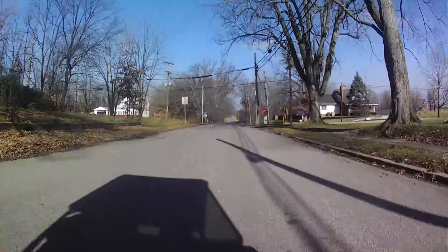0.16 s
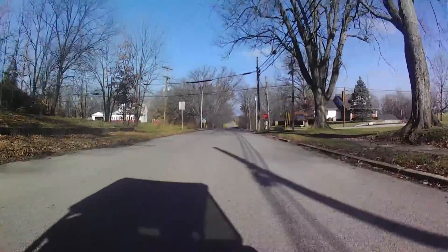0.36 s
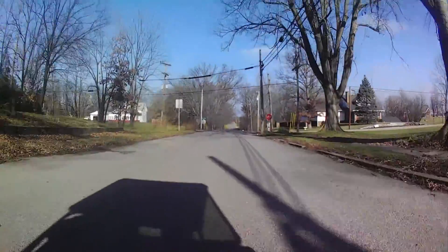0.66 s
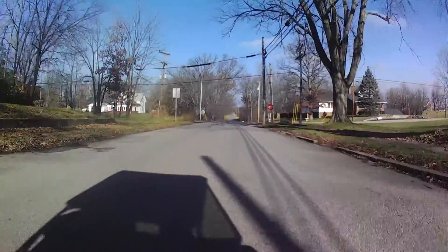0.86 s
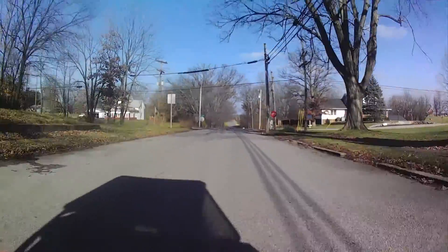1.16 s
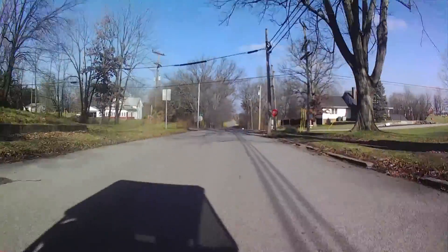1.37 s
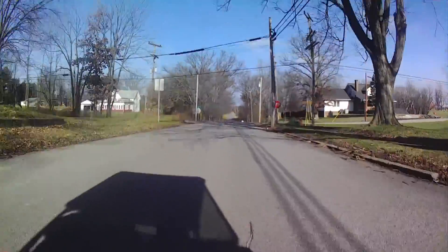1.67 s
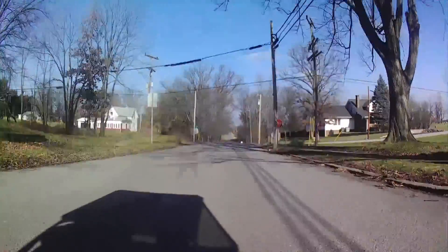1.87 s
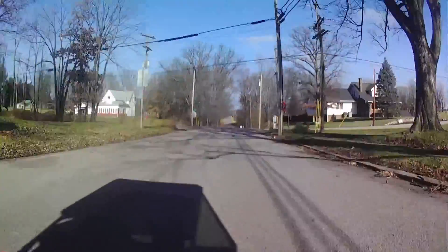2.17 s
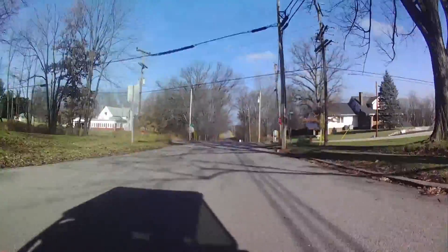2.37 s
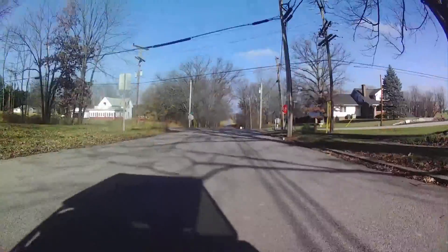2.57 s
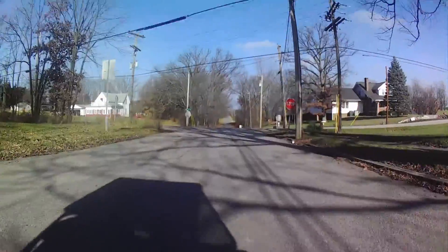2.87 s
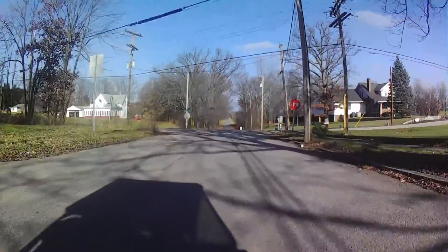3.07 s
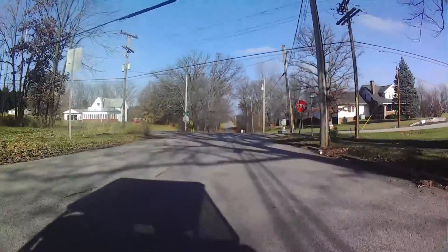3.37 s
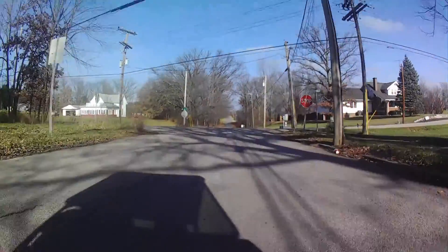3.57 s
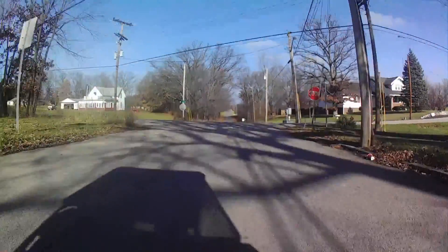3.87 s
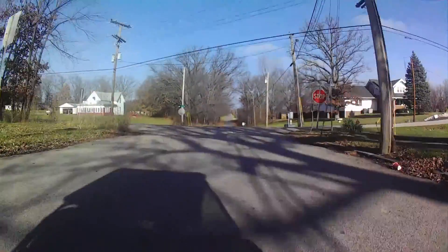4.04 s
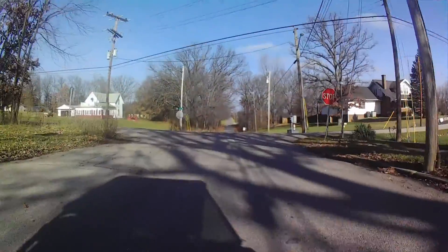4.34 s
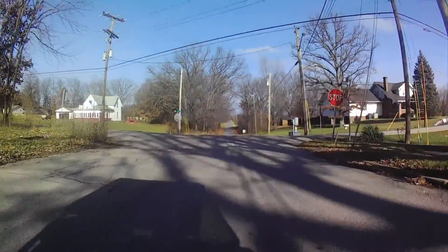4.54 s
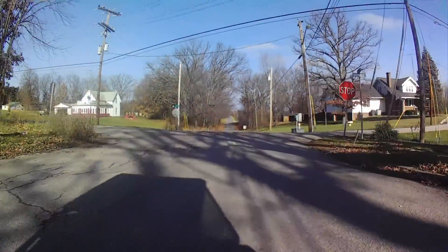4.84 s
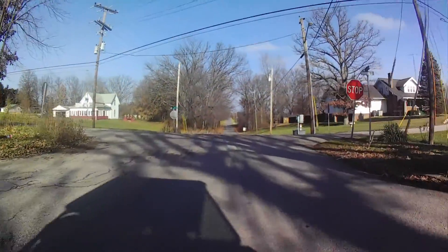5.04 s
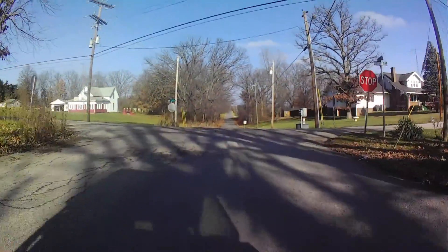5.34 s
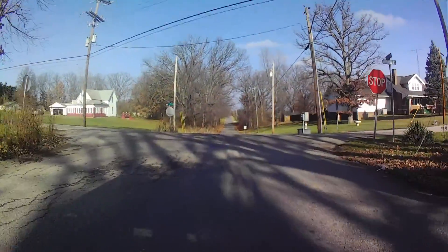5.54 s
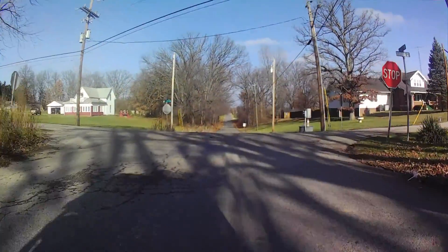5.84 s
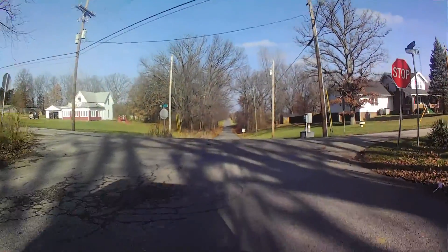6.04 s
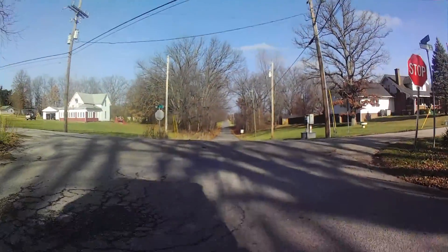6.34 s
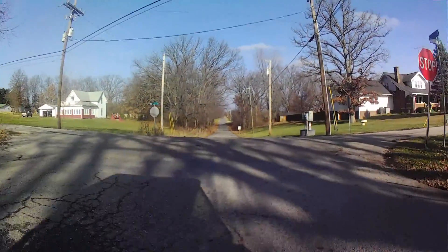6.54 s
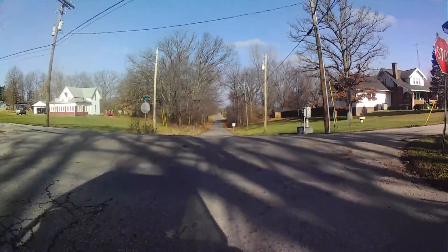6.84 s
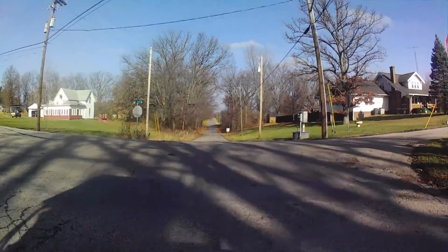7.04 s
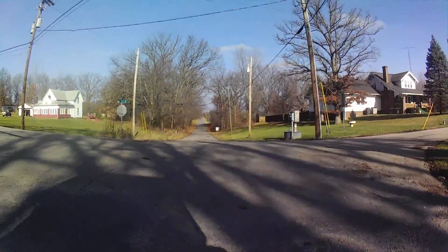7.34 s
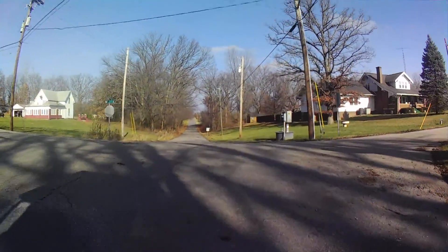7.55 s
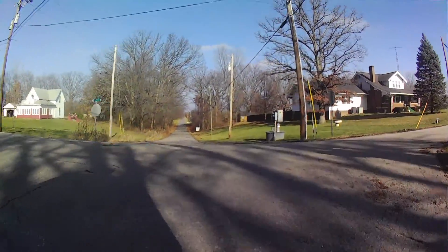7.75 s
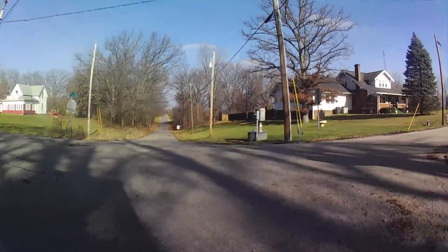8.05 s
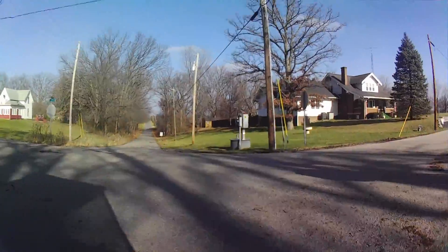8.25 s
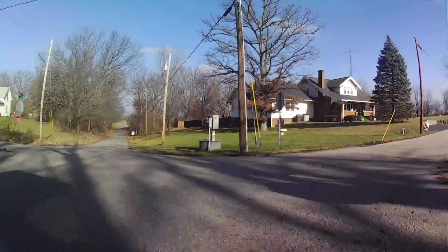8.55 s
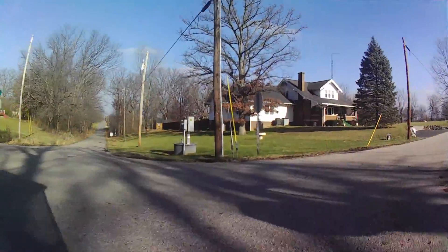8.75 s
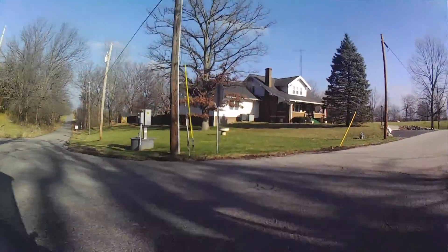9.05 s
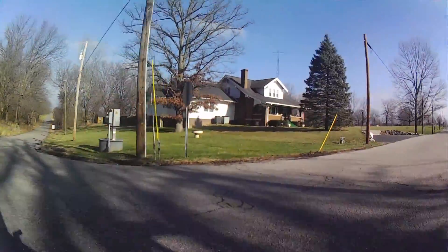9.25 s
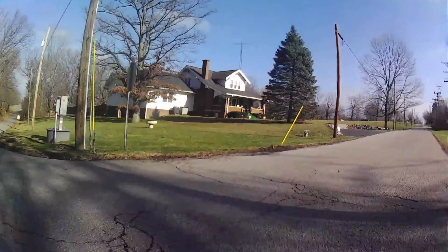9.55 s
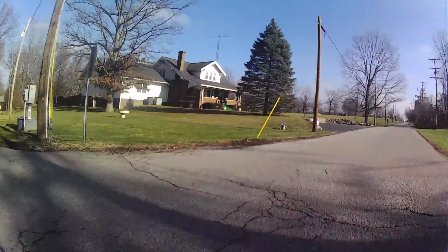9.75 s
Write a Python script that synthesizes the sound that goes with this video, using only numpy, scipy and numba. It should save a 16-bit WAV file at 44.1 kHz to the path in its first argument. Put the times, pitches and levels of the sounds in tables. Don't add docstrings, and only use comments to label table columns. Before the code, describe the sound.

A cheap microphone rides on a small petrol cart outdoors, with no room echo and squashed, gritty sound. From 0 to 4 s the two-cylinder engine putters unevenly at moderate speed, briefly surging near 1.6 s, with metallic valve clacks, low frame hum, broad tyre roar and dense panel rattle. Chassis thuds cluster through the first 2 s, with the hardest knocks near 3.2 and 3.5 s; a faint tread whine falls in pitch until 3 s. Small bracket raps and latch clicks scatter throughout. From 4 to 6.5 s the cart coasts, tyres quieten, brake drag adds hiss, and the engine sinks to a slow lumpy idle. Between 6.7 and 7.5 s it catches in irregular low pops and short bursts. Revs climb to about 8.2 s, then a fuller, steady exhaust growl with rougher road rumble and rattles continues to the end near 9.9 s.

```python
import sys
import numpy as np
from scipy import signal
from scipy.fft import rfft, irfft
from scipy.io import wavfile
from scipy.ndimage import uniform_filter1d
from numba import njit

SR = 44100
rng = np.random.default_rng(int(sys.argv[2]) if len(sys.argv) > 2 else 0)


def how_loud(loudness_db):
    steps = np.asarray(loudness_db, float) / 20
    return 10 ** steps


def dump_mix(stems):
    frames = np.atleast_2d(stems).T
    limited = np.clip(frames, -1, 1)
    pcm = np.round(limited * 32767).astype(np.int16)
    wavfile.write(sys.argv[1], SR, pcm)


N = 437031
PULLING_DB = -33


def level(x, db):
    return x * how_loud(db) / np.sqrt(np.mean(x ** 2))


def columns(table):
    s, *rest = np.transpose(table)
    t = np.arange(N) / SR
    return [np.interp(t, s, column) for column in rest]


def swells(table, rise_s, fall_s):
    t = np.arange(N) / SR
    return sum(np.interp(t, [s - rise_s, s, s + fall_s], [0, db, 0]) for s, db in table)


@njit
def svf(x, hz, width):
    y = np.empty(len(x))
    band, low = 0., 0.
    g, k = np.tan(np.pi * hz / SR), width / hz
    for i in range(len(x)):
        v = (band + g * (x[i] - low)) / (1 + g * (g + k))
        band, low = 2 * v - band, low + 2 * g * v
        y[i] = k * v
    return y


def steep(x, hz, width):
    hz, width = float(hz), float(width)
    return svf(svf(x, hz, width), hz, width)


def coloured(points):
    hz, db = np.transpose(points)
    log_f = np.log(np.fft.rfftfreq(N, 1 / SR) + 1)
    gain = how_loud(np.interp(log_f, np.log(hz), db, left=-90, right=-90))
    return level(irfft(rfft(rng.standard_normal(N)) * gain, N), 0)


def walk(rate_hz):
    hold = int(SR / rate_hz)
    steps = np.repeat(rng.standard_normal(N // hold + 1), hold)
    return uniform_filter1d(steps, hold // 2)[:N]


def per_cycle(turn, place, scatter_db):
    gains = how_loud(scatter_db * rng.standard_normal(size=400))
    return gains[(turn - place + 1.5).astype(int)]


PUFFS = [
    (.18, -.45, .7),
    (.392, .4, .15),
    (.548, -.45, -.6),
    (.75, -.65, .55),
]
# cycle_multiple, level_db
LOAD_NOTES = [(8, -17), (14, -18), (16, -17), (17, -19), (21, -17)]
# peak_s, extra_effort_db
CATCHES = [
    (6.74, 24),
    (7.0, 20),
    (7.24, 13),
    (7.46, 8),
]


def exhaust(turn, effort_db):
    effort_db = effort_db + swells(CATCHES, rise_s=0.018, fall_s=0.085)
    boom, bark = np.zeros(N), np.zeros(N)
    for place, boom_push, bark_push in PUFFS:
        count = np.floor(turn - place)
        pulse = np.diff(count, prepend=count[0]) * per_cycle(turn, place, 0.43)
        boom += boom_push * pulse
        bark += bark_push * pulse
    chambers = level(steep(boom, hz=118, width=68) + steep(bark, hz=329, width=85), 0)
    notes = sum(np.sqrt(2) * how_loud(db) * np.cos(2 * np.pi * k * turn) for k, db in LOAD_NOTES)
    coast_db = 0.8 * np.minimum(effort_db - PULLING_DB, 0)
    return how_loud(effort_db) * (chambers + notes * how_loud(coast_db))


# start_s, level_db, pitch_hz
POPS = [
    (6.726, -31, 191),
    (6.929, -33, 193),
    (6.989, -16.5, 191),
    (7.029, -21.5, 190),
    (7.224, -17.5, 189),
    (7.323, -21, 190),
    (7.399, -20, 190),
    (7.449, -24, 190),
    (7.519, -22, 190),
]


def lone_firings():
    return knocks(POPS, burst_s=0.0092, cycles=0.48, gain_db=2.1, crack=0.3)


# place_cycle [0-1], level_db
CLACKS = [
    (.015, 0),
    (.54, -11),
    (.68, -8.5),
]
# freq_hz, width_hz, level_db
CASING = [(1742.5, 147, 1), (1940, 104, -1.5), (1803, 140, -17.5), (1135, 190, -4.5)]


def casing(turn, lash_db):
    def ring(x):
        return level(sum(how_loud(db) * steep(x, hz, width) for hz, width, db in CASING), 0)

    clacks = np.zeros(N)
    for place, db in CLACKS:
        late = (turn - place + 0.5) % 1 - 0.5
        hz = 1880 * per_cycle(turn, place, 0.12) + 1700 * late
        chatter = np.sin(2 * np.pi * np.cumsum(hz) / SR) + 0.6 * rng.standard_normal(N)
        burst = np.exp(-(late / 0.05) ** 2)
        clacks += how_loud(db) * per_cycle(turn, place, 1.2) * burst * chatter
    clatter = steep(clacks, 1900, 900) + 0.5 * ring(clacks) * clacks.std()

    base_db, lash_share = -34.5, 0.1
    buzz_db = base_db + lash_share * (lash_db - base_db)
    stirred = 0.39 + 1.2 * np.exp(-((turn - CLACKS[0][0]) % 1) / 0.054)
    flicker_db = 1.2 * walk(25)
    buzz = how_loud(buzz_db - 0.5 + flicker_db) * ring(stirred * rng.standard_normal(N))
    return how_loud(lash_db) * level(clatter, 0) + buzz


# cycle_multiple, level_db
HUM = [(3, -16), (5, 4.5), (6, -26), (9, -5), (10, -17), (14, -10), (18, -10.5)]


def frame(turn, cycle_hz, effort_db):
    cruise_hz, cruise_effort_db, idle_hz = 16, -35, 14
    hum_db = -41 + 0.96 * (cycle_hz - cruise_hz) - 0.14 * (effort_db - cruise_effort_db)
    hum_db = hum_db + 3.5 * np.minimum(cycle_hz - idle_hz, 0)
    lines = np.zeros(N)
    for k, db in HUM:
        phase = 2 * np.pi * k * turn + 0.17 * walk(5.4) + k * k
        lines += how_loud(db + 2.1 * walk(5)) * np.sin(phase)
    return np.sqrt(2) * how_loud(hum_db) * lines


# freq_hz, density_db [dB per Hz]
RUMBLE = [(28, -31), (54, -6.5), (85, -3.5), (200, -1.5), (330, -2.5), (400, -7.5), (470, -16.5)]
ROAR = [(340, -9), (420, 0), (540, 0.5), (700, -2.5), (1100, -4.5), (1450, -6), (2000, -7.5), (2450, -32.5),
        (2900, -29)]
# time_s, pitch_hz, level_db
TREAD = [
    (.55, 128.2, -44),
    (.7, 129.6, -34),
    (1.4, 121.7, -50),
    (1.8, 121.9, -36),
    (1.92, 120.9, -30.5),
    (2.2, 118.2, -53),
    (2.5, 111.4, -35),
    (2.8, 105.7, -31.5),
    (3.1, 104.4, -49.5),
]


def tyres(turn, roar_db, rough_db, effort_db):
    patch_db = 1
    rumble_db = 0.5 + roar_db + 0.97 * rough_db - 0.9 * np.maximum(effort_db - PULLING_DB, 0)
    throb = 0.69 + sum(1.03 * np.exp(-((turn - place) % 1) / 0.2) for place, _, _ in PUFFS[::2])
    rumble = coloured(RUMBLE) * throb * how_loud(rumble_db - 1.5 + patch_db * walk(11))
    roar = coloured(ROAR) * how_loud(roar_db + 5.0 + patch_db * walk(16))

    fade_in = (TREAD[0][0] - 0.1, TREAD[0][1], -70)
    fade_out = (TREAD[-1][0] + 0.1, TREAD[-1][1], -70)
    hz, db = columns([fade_in, *TREAD, fade_out])
    tread = np.sqrt(2) * how_loud(db) * np.sin(2 * np.pi * np.cumsum(hz) / SR)
    return rumble + roar + tread


# peak_s, swell_db
JOLTS = [(.63, 2.5), (.72, 3), (1.02, 6), (1.16, 3), (1.35, 4), (1.43, 2), (1.52, 5.5), (1.63, 9),
         (2.07, 8), (2.15, 6), (2.21, 6), (2.48, 5.5), (2.56, 7), (2.76, 1), (2.84, 6.5), (3.23, 6.5),
         (4.14, 2), (4.22, 3), (5.45, 4), (6.02, 5), (6.32, 3), (6.65, 10), (6.82, 7), (7.09, 4.5),
         (7.46, 7), (7.52, 6), (7.84, 7.5), (7.92, 4), (8.06, 6), (8.69, 6)]
# dip_s, dip_db
LULLS = [(.69, -7.5), (1.24, -7), (1.41, -8), (1.49, -2), (2.45, -5), (2.54, -5), (2.73, -7.5),
         (2.81, -8.5), (3.17, -4), (3.37, -9), (4.08, -9), (4.19, -6), (4.29, -9), (4.46, -13), (4.53, -10),
         (4.62, -11), (5.11, -9), (5.23, -12), (5.4, -9), (5.93, -14), (6.15, -13.5), (6.35, -8),
         (6.57, -9), (6.79, -17), (6.93, -17), (7.06, -10), (7.2, -8), (7.42, -5), (7.78, -1), (8.64, -5.5)]
# start_s, end_s, level_db
BRAKING = [
    (4.705, 4.86, -2.5),
    (4.95, 5.08, 1),
    (5.44, 5.913, 3),
    (6.21, 6.547, 0),
]
# freq_hz, density_db [dB per Hz]
BELT = [(5300, 0), (6100, 10.5), (7200, 7.5), (8200, 4), (9600, 0), (12200, 1.5), (13000, 12.5)]


def bodywork(roar_db, rough_db):
    jolt_db = swells(JOLTS, rise_s=0.028, fall_s=0.041)
    lull_db = swells(LULLS, rise_s=0.031, fall_s=0.031)
    brake_db, edge_s = np.zeros(N), 0.03
    for start_s, end_s, db in BRAKING:
        brake_db += columns([(start_s - edge_s, 0), (start_s, db), (end_s, db), (end_s + edge_s, 0)])[0]
    roll_db = roar_db + 32
    shake_db = -46 + roll_db + 0.9 * rough_db + jolt_db + 0.56 * lull_db + 0.54 * brake_db
    hiss_db = -48.5 - 0.0036 * roll_db + 0.72 * jolt_db + lull_db + brake_db

    grain = how_loud(0.88 * walk(24))
    panels = coloured([(1100, -16), (1500, 5.5), (2150, 6.0), (2500, 0.5), (2800, -8.5), (3300, -4),
                       (3800, -2.5), (4500, -6.5), (5500, -27)])
    panels = panels * how_loud(shake_db + 4.0 + 3.6 * walk(250) + 1.2 * walk(15))
    belt = coloured(BELT) * how_loud(hiss_db + 0.3 + 3.53 * walk(300) + 0.61 * walk(20))

    ticks_per_s, scatter_db = 110, 13
    ticks = (rng.random(N) < ticks_per_s / SR) * how_loud(scatter_db * rng.random(N))
    jingle = level(steep(ticks, hz=3260, width=417), -5) * how_loud(shake_db)
    return grain * (panels + belt) + jingle


def knocks(table, burst_s, cycles, gain_db, crack):
    out, t = np.zeros(N), np.arange(4096) / SR
    for s, db, hz in table:
        burst = rng.standard_normal(len(t)) * np.exp(-t / burst_s)
        ring = steep(burst, hz, hz / cycles)
        snap = svf(burst * np.exp(-t / 0.0093), 0.88 * hz, 2. * hz)
        knock = (ring / np.abs(ring).max() + crack * snap) * how_loud(db + gain_db)
        i = int(s * SR)
        out[i:i + len(t)] += knock[:N - i]
    return out


# start_s, level_db, pitch_hz
BUMPS = [(0.27, -18, 190), (1.07, -14, 179.6), (1.53, -14.5, 197), (1.62, -12, 193), (4.2, -20, 200),
         (0.426, -14, 477), (0.722, -13, 388), (1.005, -12, 468), (1.192, -11, 312), (1.573, -13, 322),
         (2.924, -15, 321), (3.227, -6, 587), (3.469, -9.5, 596), (3.771, -24, 310), (5.084, -22, 334),
         (5.289, -20, 324), (6.991, -30, 250)]


def bumps():
    return knocks(BUMPS, burst_s=0.0076, cycles=4.4, gain_db=-7.5, crack=0.28)


# start_s, level_db, pitch_hz
RATTLES = [(0.332, -24, 3090), (0.6315, -22, 2940), (1.1418, -22.5, 3170), (1.5293, -23, 3120),
           (1.6137, -29, 3090), (1.8346, -22, 3300), (1.9619, -20, 3500), (2.0445, -20, 3020),
           (2.2055, -20, 3250), (2.2897, -22, 3320), (2.396, -20, 3290), (2.4626, -35, 3250),
           (2.7631, -26, 3296), (3.3992, -24.5, 3270), (3.5772, -25, 3300), (3.7688, -28, 3220),
           (4.2225, -24.5, 3160), (4.8304, -26, 3280), (5.832, -30.5, 3240), (6.0028, -32.5, 3290),
           (6.092, -29.5, 3240), (6.185, -36, 3260), (6.3789, -31, 3310), (6.6394, -30.5, 3290),
           (6.8274, -38, 3330), (7.449, -23, 3150), (8.2033, -26, 3300), (8.3624, -31, 3400),
           (9.5233, -25, 3180), (9.7058, -26, 3260)]


def bracket():
    return knocks(RATTLES, burst_s=0.0069, cycles=3.5, gain_db=-1.9, crack=0.55)


# start_s, level_db, pitch_hz
LATCH = [(0.4908, -27, 3270), (1.1039, -24, 2520), (1.1877, -29, 2400), (1.4382, -27, 3390),
         (1.5133, -26, 3150), (1.5808, -20, 2520), (1.6626, -21, 2500), (1.9055, -23, 2970),
         (2.145, -23, 3340), (2.2293, -21, 2300), (2.3792, -24, 2570), (2.4816, -28, 3260),
         (2.586, -26, 3330), (3.2171, -28, 2370), (3.478, -28, 2760), (3.9556, -28, 3190),
         (5.4475, -36, 3280), (7.4764, -31, 2600), (7.5154, -23, 2570), (7.891, -39, 2410),
         (8.034, -23, 2450), (8.074, -32, 2510), (8.4801, -27, 3270), (9.1197, -21, 2440),
         (9.2414, -22.5, 2380), (9.605, -40, 3230)]


def seat_latch():
    return knocks(LATCH, burst_s=0.018, cycles=3.1, gain_db=-2.6, crack=0.61)


# time_s, cycle_hz [four-stroke cycles per s]
SPEED = [(0.0, 17.85), (0.9, 17.22), (1.22, 18.41), (1.39, 17.49), (1.64, 20.33), (2.47, 17.55),
         (2.83, 16.89), (5.1, 15.01), (6.0, 12.42), (6.21, 11.02), (6.6, 10.29), (6.94, 11.96),
         (7.31, 13.28), (7.57, 15.26), (8.18, 17.57), (8.94, 17.01), (9.35, 16.31), (9.91, 17.12)]
# time_s, effort_db, lash_db
EFFORT = [(0, -33, -52), (.5, -34.5, -38), (1, -40, -51), (1.5, -29.5, -43), (1.75, -38, -46),
          (2.1, -46, -36.5), (3.2, -32, -38), (4, -38, -33), (4.6, -39, -33), (5.1, -37, -29.5),
          (5.6, -41, -35), (5.95, -46.5, -37.5), (6.2, -54, -34), (7.1, -47, -35.5), (7.5, -35, -32),
          (7.8, -27, -41), (8.3, -26, -35.5), (9.91, -27, -37.5)]
# time_s, roar_db, rough_db
ROAD = [(0, -27.5, -1.5), (.5, -29, -0.5), (1.1, -29, 1.5), (1.35, -29.5, -0.5), (1.62, -28.5, 3.5),
        (1.75, -29.5, -0.5), (2.2, -30, 3), (3.2, -30.5, -1), (4.2, -33.5, 1), (5.2, -35.5, 1.5),
        (5.7, -37, 1), (6.8, -37, -2), (7.2, -34, 0), (7.5, -34.5, 3), (8, -33, 4.5), (8.6, -33, 3.5),
        (9.2, -32, 3.5), (9.91, -33, 5.5)]


def scene():
    cycle_hz, = columns(SPEED)
    start_turn = 0.561
    turn = start_turn + np.cumsum(cycle_hz) / SR
    effort_db, lash_db = columns(EFFORT)
    roar_db, rough_db = columns(ROAD)
    engine = exhaust(turn, effort_db) + lone_firings()
    engine = engine + casing(turn, lash_db) + frame(turn, cycle_hz, effort_db)
    cart = tyres(turn, roar_db, rough_db, effort_db) + bodywork(roar_db, rough_db)
    loose = bumps() + bracket() + seat_latch()
    return (engine + cart + loose)[None]


# low_hz, high_hz, dropped_share [0-1], rattle_masking [0-1]
GAPS_HZ = [(2290, 2420, .22, 0), (2420, 2580, .16, 0), (2580, 2720, .28, 0), (2720, 2880, .38, 0),
           (2880, 3050, .2, 0), (4600, 4780, .7, 0), (4780, 5050, .95, 0), (5050, 5280, .95, 0),
           (5280, 5480, .82, 0), (9800, 10100, .15, .4), (10100, 10350, .6, .4), (10350, 11020, 1, 0),
           (11020, 11350, .6, .4), (11350, 11700, .32, .5), (11700, 12400, .14, .6),
           (12400, 12620, .22, .6), (12620, 12850, .75, .4), (12850, 16000, 1, 0)]


def starved(x):
    hz, _, frames = signal.stft(x, SR, nperseg=2048)

    def power(low_hz, high_hz):
        return np.sum(np.abs(frames[(hz >= low_hz) & (hz < high_hz)]) ** 2, axis=0)

    rattle = power(2500, 4600)
    for low_hz, high_hz, share, masking in GAPS_HZ:
        scatter = how_loud(1.7 * rng.standard_normal(len(rattle)))
        weight = power(low_hz, high_hz) / rattle ** masking * scatter
        frames[(hz >= low_hz) & (hz < high_hz)] *= weight > np.quantile(weight, share)
    return signal.istft(frames, SR, nperseg=2048)[1][:N]


def roll_off(x):
    return signal.sosfilt(signal.butter(12, 13940, fs=SR, output="sos"), x)


def record(dry):
    rounded = np.tanh(4.24 * dry[0]) / 4.92
    mix = starved(rounded)[None]
    return roll_off(mix)


dry = scene()
out = record(dry)
dump_mix(out)
```